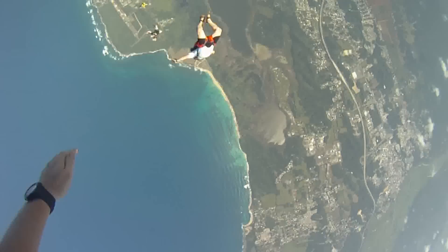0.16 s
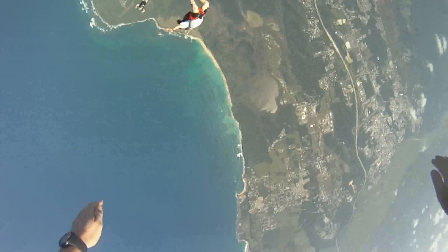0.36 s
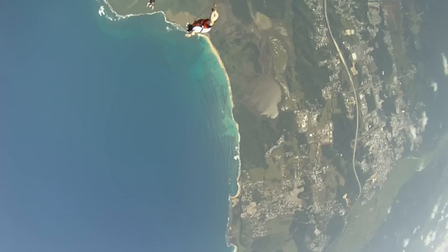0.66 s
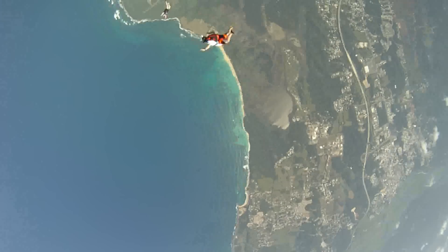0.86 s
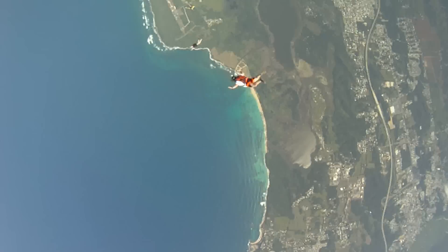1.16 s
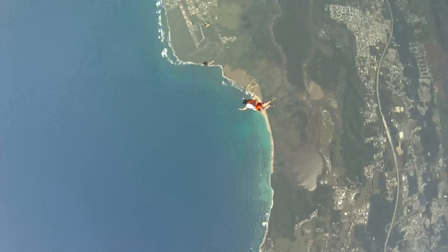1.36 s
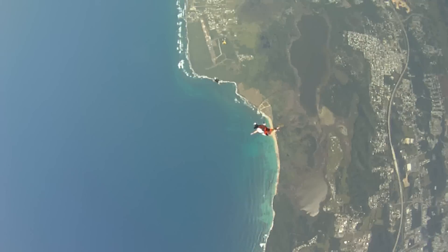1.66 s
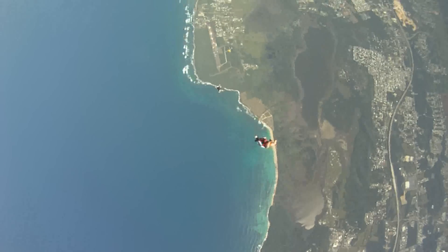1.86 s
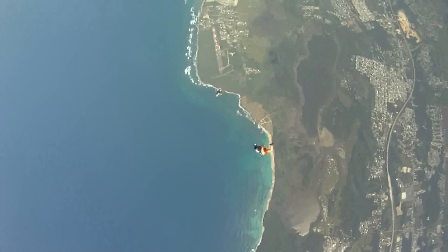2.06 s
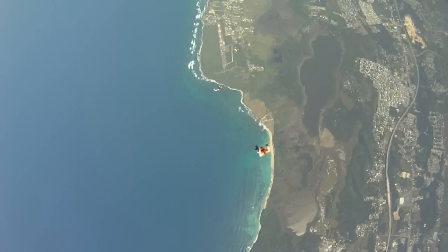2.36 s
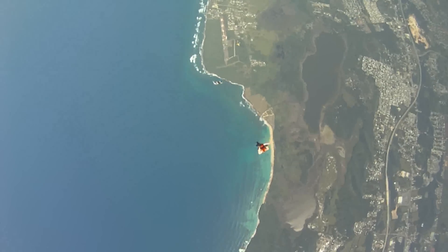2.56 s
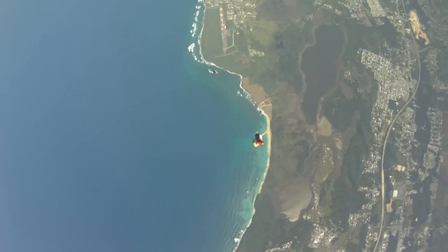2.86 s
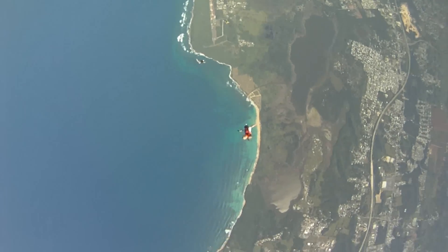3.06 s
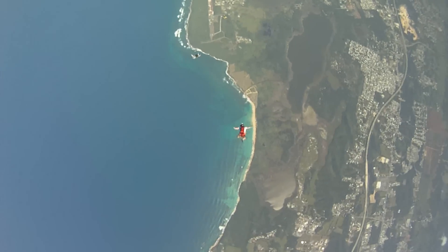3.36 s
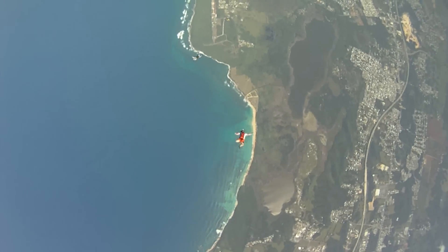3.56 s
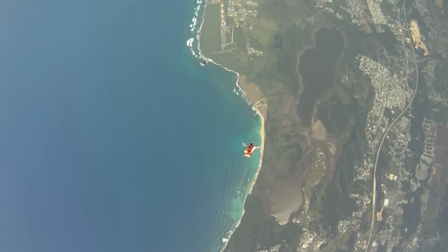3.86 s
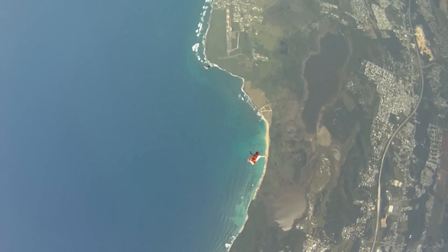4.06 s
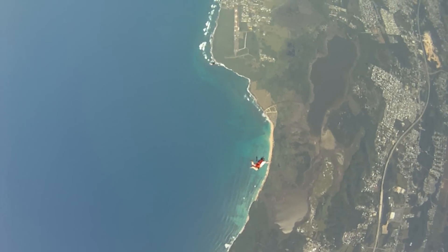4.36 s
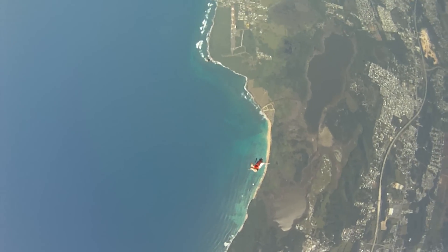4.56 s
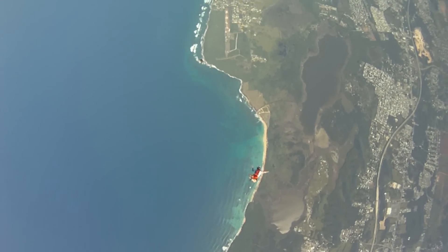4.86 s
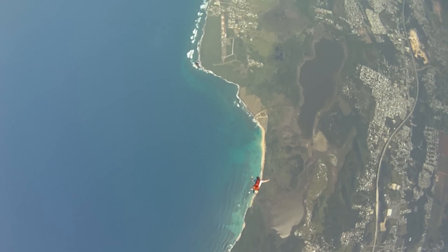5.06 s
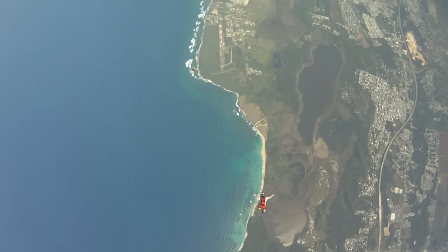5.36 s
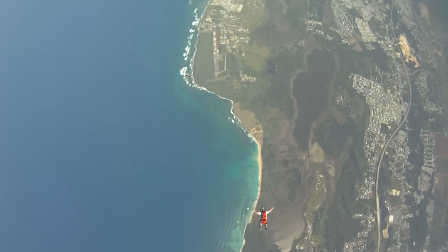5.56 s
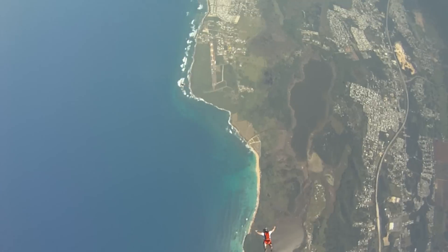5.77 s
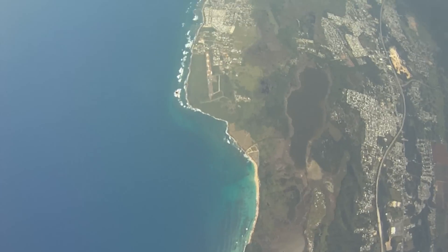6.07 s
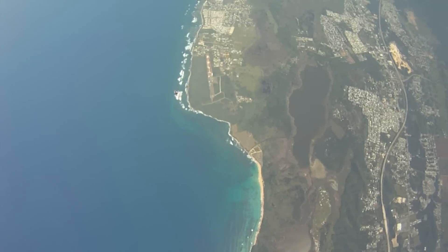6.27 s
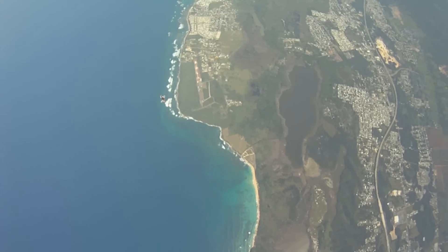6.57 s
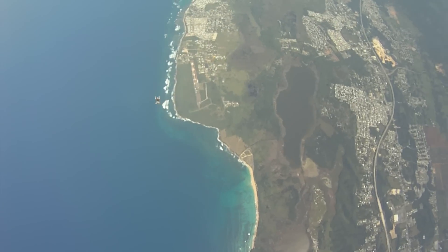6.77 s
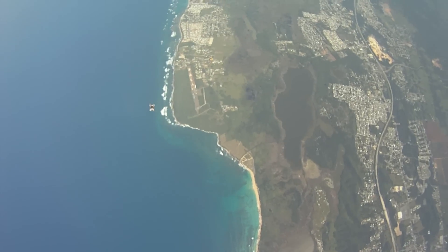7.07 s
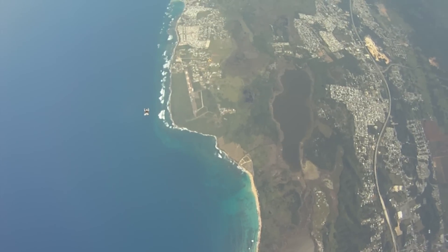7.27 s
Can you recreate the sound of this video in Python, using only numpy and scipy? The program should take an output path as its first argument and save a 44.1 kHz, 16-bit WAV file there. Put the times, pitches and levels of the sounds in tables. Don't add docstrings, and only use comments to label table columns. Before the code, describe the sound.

Skydiving wind heard from a small camera microphone worn on the jumper. A muffled rush swells within a quarter second into a dense, loud roar. Low buffeting and hollow drumming sit under a harsh hiss. A thin wavering whistle and a low hum come through during the first second or so, then the roar holds steady, with sharp gusty pops and brief dips in level until it stops.

```python
import sys
import numpy as np
from scipy import signal
from scipy.fft import rfft, irfft, next_fast_len
from scipy.io import wavfile
from scipy.ndimage import uniform_filter1d, map_coordinates

SR = 44100
rng = np.random.default_rng(int(sys.argv[2]) if len(sys.argv) > 2 else 0)


def store_pcm(level_fs):
    pcm = np.round(np.clip(level_fs, -1, 1) * 32767).astype(np.int16)
    wavfile.write(sys.argv[1], SR, np.atleast_2d(pcm).T)


def gain_from_db(level_db):
    decades = np.asarray(level_db, float) / 20
    return 10 ** decades


N = 327222

# time_s, flow_over_port_db, wake_behind_head_db
FLOW = [(0, -21.5, -9.5), (.1, -10.5, -2.5), (.19, -4.5, 2), (.25, 2, 2.5), (.36, -2.5, -2.5),
        (.8, -1.5, 0), (.86, 2.5, 0), (.93, -4.5, -3), (1.03, -1, 1), (2.0, 0, 1), (3.38, -1, 1.5),
        (3.45, -1, -3), (4.3, 0, 0), (4.5, -1, -4), (5.3, 0, -6), (5.4, -1.5, -7.5), (6.1, 0, -5.5),
        (7.42, -1, -7.5)]
# time_s, turned_aside (0-1), chin_down (0-1)
POSE = [(0, 0.25, 0.4), (.3, 0.35, 0.65), (.85, 0.81, 0.6), (1.3, 0.51, 0.6), (1.6, 0.37, 0.7),
        (2.0, 0.22, 0.55), (3.4, 0.1, 0.62), (4.3, 0.14, 0.57), (5.3, 0.02, 0.4), (5.6, 0, 0.2),
        (7.42, 0, 0.18)]
# time_s, surge_in_port_db, gain_duck_db
EDDIES = [(0.836, 7, 9), (1.39, 6, 4), (3.636, 6, 1), (3.843, 7.5, 6), (4.065, 8, 5.5), (4.307, 7, 6.5),
          (4.456, 6, 1), (4.63, 2, 1), (4.779, 7, 3), (5.09, -5, 3), (5.311, 5.5, 4), (5.742, 5, 4.5),
          (5.865, 4, 2), (6.166, 2, 6), (6.26, -2, 3), (6.41, -4, 6.5), (6.434, 11, 0), (6.563, 3, 9.5),
          (6.865, 0, 1.5), (7.004, 5.5, 1), (7.035, 2, 5), (7.082, 10, -2.5), (7.283, 7, 1.5)]
# time_s, level_db
THUDS = [(.025, 6), (.14, 7.5), (.35, -6), (.87, 2), (.93, -8), (1.03, 5.5), (1.3, -2), (1.8, 2),
         (1.98, -3), (2.37, 2), (2.56, -2), (2.9, 2), (3.39, 2), (3.82, -9), (4.12, 4.5), (4.34, 4),
         (4.92, 2), (4.98, 1), (5.35, -1), (6.03, 8), (6.43, -4.5)]

# pitch_hz, level_db
BUFFET = [(9, -46), (15, -17), (40, -9), (62, -5), (82, 1), (100, -6.5), (120, -9), (180, -9), (230, -40),
          (400, -120)]
DRUM = [(82, -30), (140, -3.5), (296, 5), (480, -8.5), (620, -36), (1060, -120)]
DRUM_ASIDE = [(82, -32), (140, -17), (210, -4.5), (280, -7), (314, -2.5), (449, -28), (493, -9.5),
              (553, -11), (646, -14), (700, -16), (910, -49), (1540, -120)]
SHELL = [(250, -47), (420, -34), (517, -17), (613, -14.5), (663, -5.5), (718, -9.5), (888, 1), (1010, -8.5),
         (1130, -8), (1230, -13.5), (1340, -15), (1510, -17.5), (1800, -42), (2340, -27), (3960, -120)]
SHELL_DOWN = [(250, -20), (420, -11), (486, -15), (569, -0.5), (639, -9.5), (713, 2.5), (888, -5.5),
              (1160, -10.5), (1270, -4.5), (1510, -10), (1800, -9.5), (2340, -20.5), (3960, -120)]
PORT = [(880, -50), (1500, -19), (1730, -17.5), (2360, 0.5), (2730, -13), (3030, -12.5), (3190, -20),
        (3710, -16), (4410, -27.5), (5100, -17.5), (5340, -24), (5760, -35.5), (6000, -37.5), (7800, -70),
        (13200, -120)]
PORT_ASIDE = [(880, -40), (1500, -17.5), (1940, -1), (2170, 5), (2680, -5), (2790, -5), (2960, -2.5),
              (3500, 0), (3790, -7), (4140, -8), (5280, -10), (5790, -30.5), (6000, -29), (7800, -62),
              (13200, -120)]
# level_db, db_per_flow_db, db_per_wake_db, turned_aside_db
BUFFET_RULE = (-26, -0.2, 0.88, 1.5)
DRUM_RULE = (-25.5, -0.24, 0.81, 2.5)
SHELL_RULE = (-17.5, 0.27, 0.78, -9)
PORT_RULE = (-17, 1.2, -0.2543, 1.5)

# start_s, length_s, pitch_hz, level_db
WHISTLES = [
    (.348, .292, 3540, -21.5),
    (.655, .195, 4080, -31.5),
    (1.06, .115, 4170, -29.5),
    (1.18, .125, 3540, -24),
    (1.322, .08, 3440, -18),
]

# from_hz, to_hz, threshold_db
SPARED = [(5730, 6060, -65.7), (10550, 10900, -60), (10900, 11250, -56.8), (11250, 11850, -64.3),
          (11850, 12330, -50), (12330, 13250, -62.3), (13250, 13620, -63.8), (13620, 14750, -60),
          (14750, 15330, -60.5), (15330, 22050, -40)]
SPLIT_EDGES = [0, 340, 690, 1380, 1900, 2900, 3700, 4700, 5700, 6900, 7600, 8300, 9000, 9600, 10300, 11700,
               12400, 13800, 14500, 15200]
# pitch_hz, share_of_frames (0-1)
SPLIT_SHARE = [(200, .09), (1600, .09), (2400, .3), (3300, .09), (7000, .05), (14000, .09)]
# pitch_hz, difference_db
SPLIT_DB = [(170, -27), (1000, -18), (1600, -13.5), (2400, -14), (4000, -10), (14000, -9)]

THUD_S, SURGE_S, DUCK_S = 0.043, 0.0037, 0.042
RING, RING_HZ = 0.16, 2350
WHISTLE_FADE_S, SLIDE_HZ, SLIDE_S = 0.013, 600, 0.024
HUM_FROM_S, HUM_TO_S, HUM_FADE_S = 0.3, 0.82, 0.032
HUM_HZ, HUM_WIDTH_HZ, HUM_DB = 282, 84, -24
HOLD_HZ = 12000


def unit(x):
    return x / np.sqrt(np.mean(x ** 2) + 1e-20)


def curves(rows):
    s, *cols = np.transpose(rows)
    return [np.interp(np.arange(N) / SR, s, c) for c in cols]


def wobble(rate):
    knots = rng.standard_normal(int(N * rate / SR) + 4)
    return map_coordinates(knots, [np.arange(N) * rate / SR])


def filtered(x, response):
    m = next_fast_len(N + 8192)
    return irfft(rfft(x, m) * response(np.fft.rfftfreq(m, 1 / SR)), m)[..., :N]


def coloured(noise, spectrum):
    f, level_db = np.transpose(spectrum)

    def response(hz):
        return gain_from_db(np.interp(np.log(hz + 1), np.log(f + 1), level_db, -120, -120))

    return unit(filtered(noise, response))


def rush(spectrum, other, blend, patchy_db, flutter_db, flutter_hz):
    z = signal.stft(rng.standard_normal(N), nperseg=512)[2]
    patches = uniform_filter1d(rng.standard_normal(z.shape), size=5, axis=0)
    patches = uniform_filter1d(patches, size=8, axis=1)
    noise = signal.istft(z * gain_from_db(patchy_db * unit(patches)), nperseg=512)[1][:N]
    share = np.clip(blend, 0, 1)
    mix = (1 - share) * coloured(noise, spectrum) + share * coloured(noise, other)
    return unit(mix * gain_from_db(flutter_db * wobble(flutter_hz)))


def follow(rule):
    level_db, per_flow, per_wake, aside_db = rule
    flow_db, wake_db = curves(FLOW)
    aside, _ = curves(POSE)
    return level_db + per_flow * flow_db + per_wake * wake_db + aside_db * aside


def hum():
    t = np.arange(N) / SR
    gate = np.clip(np.minimum(t - HUM_FROM_S, HUM_TO_S - t) / HUM_FADE_S + 0.5, 0, 1)

    def cavity(f):
        damping = 1j * f * HUM_WIDTH_HZ
        return (damping / (HUM_HZ ** 2 - f * f + damping)) ** 2

    return gain_from_db(HUM_DB) * gate * unit(filtered(rng.standard_normal(N), cavity))


def whistle():
    t = np.arange(N) / SR
    start, length, stage_hz, _ = np.transpose(WHISTLES)
    stage = np.clip(np.searchsorted(start - WHISTLE_FADE_S, t) - 1, 0, None)
    first, last = start[0], start[-1] + length[-1]
    slide_in = np.exp(-np.clip(t - first, 0, None) / SLIDE_S)
    slide_out = 0.625 * np.exp(-np.clip(last - t, 0, None) / SLIDE_S)
    level = np.zeros(N)
    for s, d, _, db in WHISTLES:
        level += gain_from_db(db) * np.clip(np.minimum(t - s, s + d - t) / WHISTLE_FADE_S + 0.5, 0, 1)
    waver_hz = 35 * wobble(90) + 10 * wobble(18)
    pitch_hz = stage_hz[stage] - SLIDE_HZ * (slide_in + slide_out) + waver_hz
    phase = 2 * np.pi * np.cumsum(pitch_hz) / SR
    narrow = (1.1 + wobble(300)) * np.sin(phase) + wobble(300) * np.cos(phase)
    return level * gain_from_db(1.5 * wobble(35)) * unit(narrow)


def buffet():
    t = np.arange(N) / SR
    thuds_db = sum(db * np.exp(-((t - s) / THUD_S) ** 2) for s, db in THUDS)
    noise = rush(BUFFET, BUFFET, 0, patchy_db=0.2, flutter_db=0.1, flutter_hz=9)
    return gain_from_db(follow(BUFFET_RULE) + thuds_db) * noise


def drum(gust):
    aside, _ = curves(POSE)
    noise = rush(DRUM, DRUM_ASIDE, aside, patchy_db=-1.4, flutter_db=1.0, flutter_hz=24.77)
    return gain_from_db(follow(DRUM_RULE) + 0.14 * gust) * noise


def shell(gust, surge_db):
    _, down = curves(POSE)
    noise = rush(SHELL, SHELL_DOWN, down, patchy_db=0.4, flutter_db=0.53, flutter_hz=40.1)
    return gain_from_db(follow(SHELL_RULE) + 0.39 * gust + 0.2 * surge_db) * noise


def port(gust, surge_db):
    t = np.arange(N) / SR
    aside, _ = curves(POSE)
    noise = rush(PORT, PORT_ASIDE, aside, patchy_db=1.03, flutter_db=0.75, flutter_hz=111.2)
    hiss = gain_from_db(follow(PORT_RULE) + 0.6 + 0.5 * gust + 0.4 * surge_db) * noise
    ring = RING * (gain_from_db(surge_db) - 1) * np.sin(2 * np.pi * RING_HZ * t)
    return hiss + ring


def wind():
    t = np.arange(N) / SR
    gust = wobble(14)
    surge_db = sum(db * np.exp(-((t - s) / SURGE_S) ** 2) for s, db, _ in EDDIES)
    return buffet() + drum(gust) + shell(gust, surge_db) + port(gust, surge_db)


def scene():
    air = hum() + whistle() + wind()
    return np.array([air, air])


def spare_bands(x):
    lead = 574
    hz, t, z = signal.stft(np.pad(x, (lead, 0)), SR, "cosine", nperseg=2048)
    spent = np.zeros(len(t))
    loud_db = 10 * np.log10(np.mean(np.abs(z) ** 2, axis=0) + 1e-12)
    mask_db = 0.93 * (loud_db - np.median(loud_db))
    for lo_hz, hi_hz, need_db in SPARED:
        band = (hz >= lo_hz) & (hz < hi_hz)
        level = np.sqrt(np.mean(np.abs(z[band]) ** 2, axis=0))
        saved_db = 15 / (1 + t / 0.1) * (10000 < lo_hz < 13500)
        spent_db = 1.1 * spent * (lo_hz > 14700)
        chance_db = np.convolve(rng.standard_normal(len(t)), [1, 1], "same")
        kept = level > gain_from_db(need_db + mask_db - saved_db + spent_db + chance_db)
        z[band] *= kept
        spent += kept
    side = np.zeros_like(z)
    for lo_hz, hi_hz in zip(SPLIT_EDGES, SPLIT_EDGES[1:]):
        middle_hz = (lo_hz + hi_hz) / 2
        share = np.interp(middle_hz, *np.transpose(SPLIT_SHARE))
        apart_db = np.interp(middle_hz, *np.transpose(SPLIT_DB))
        band = (hz >= lo_hz) & (hz < hi_hz)
        random_phase = np.exp(2j * np.pi * rng.random(z[band].shape))
        side[band] = gain_from_db(apart_db) * z[band] * random_phase * (rng.random(len(t)) < share)
    stereo = np.array([z + side, z - side])
    return signal.istft(stereo, SR, "cosine", nperseg=2048)[1][:, lead:lead + N]


def band_limit(x):
    return signal.sosfilt(signal.butter(12, 16320, fs=SR, output="sos"), x)


def record(dry):
    t = np.arange(N) / SR
    duck_db = sum(db * (t > s + 0.005) * np.exp(-np.abs(t - s) / DUCK_S) for s, _, db in EDDIES)
    x = dry * gain_from_db(0.96 - duck_db)
    x = x / (1 + np.abs(x / 1.05) ** 6) ** (1 / 6)
    x = filtered(x, lambda hz: 1 / np.sinc(hz / HOLD_HZ) * (hz < HOLD_HZ / 2))
    sampled = x * (1 + 2 * np.cos(2 * np.pi * HOLD_HZ * t))
    held = filtered(sampled, lambda hz: np.sinc(hz / HOLD_HZ) / np.sqrt(1 + (hz / 15100) ** 30))
    mix = spare_bands(held[0])
    return band_limit(mix)


dry = scene()
out = record(dry)
store_pcm(out)
```